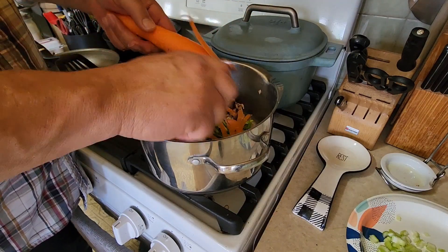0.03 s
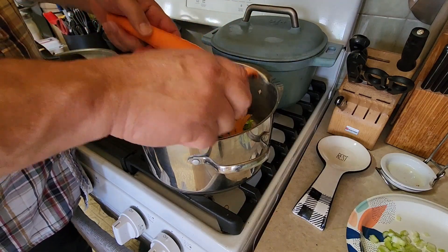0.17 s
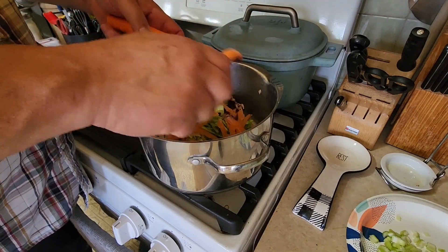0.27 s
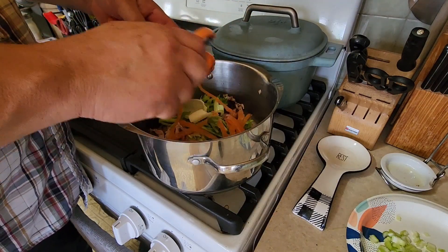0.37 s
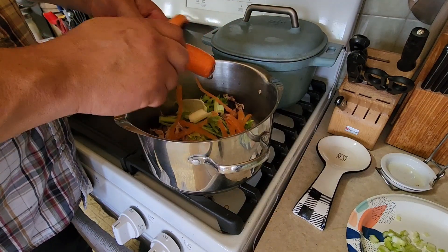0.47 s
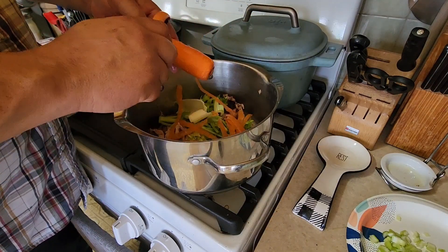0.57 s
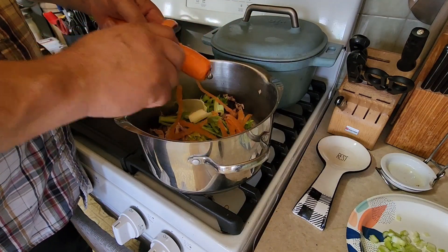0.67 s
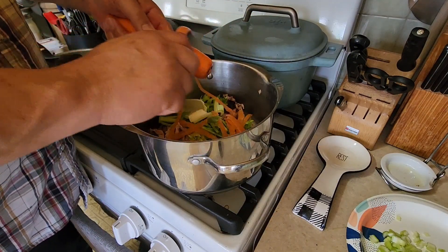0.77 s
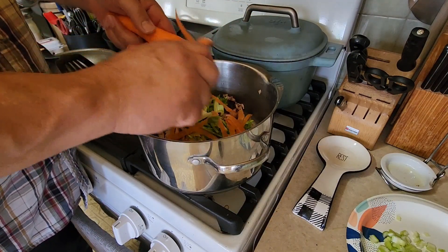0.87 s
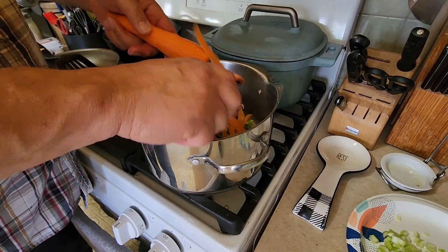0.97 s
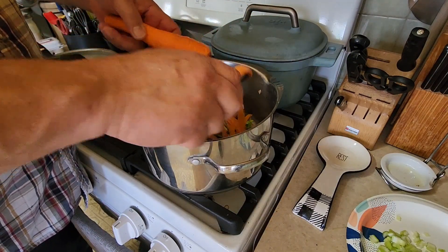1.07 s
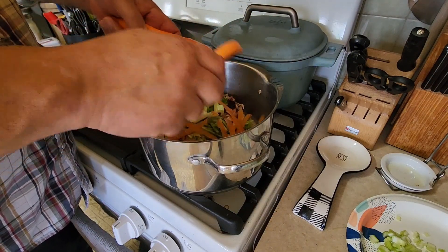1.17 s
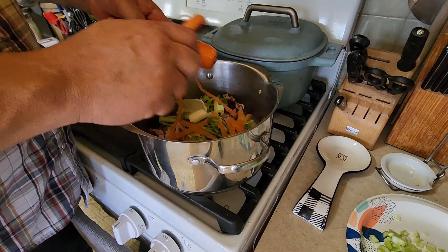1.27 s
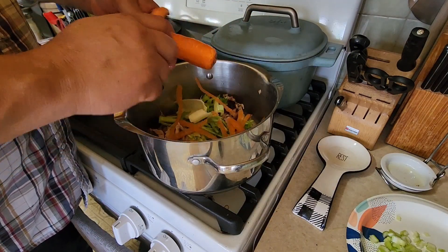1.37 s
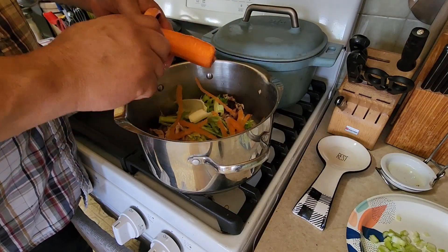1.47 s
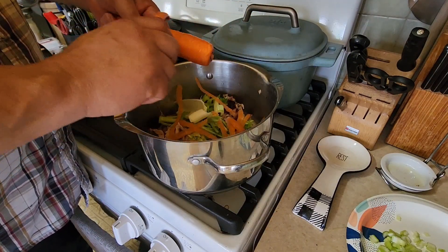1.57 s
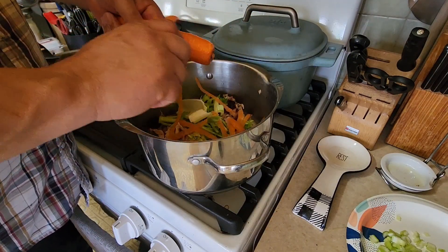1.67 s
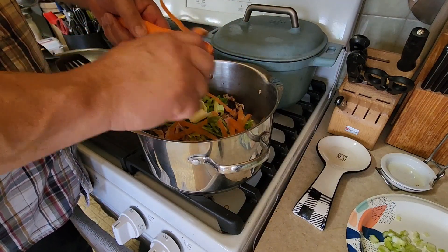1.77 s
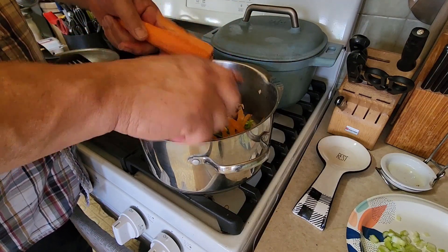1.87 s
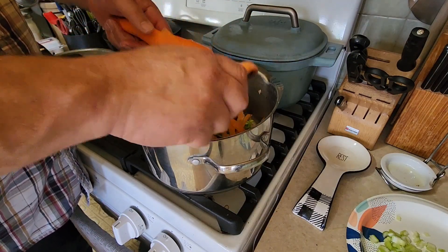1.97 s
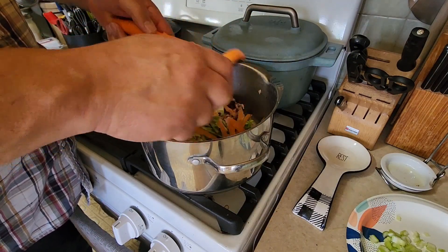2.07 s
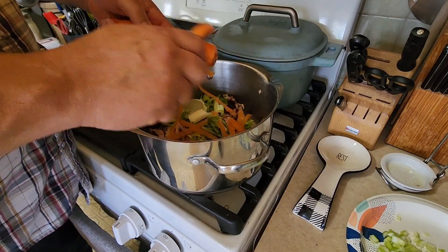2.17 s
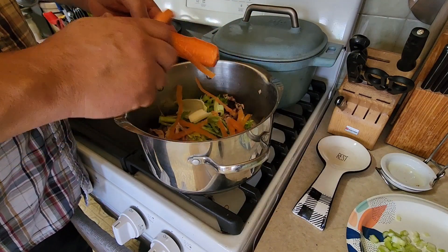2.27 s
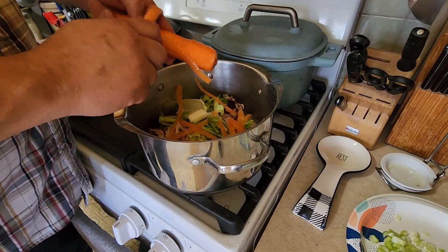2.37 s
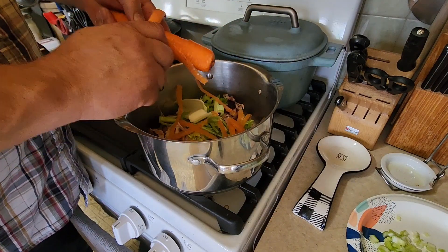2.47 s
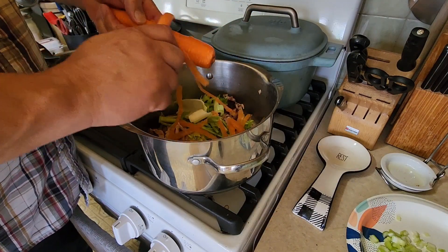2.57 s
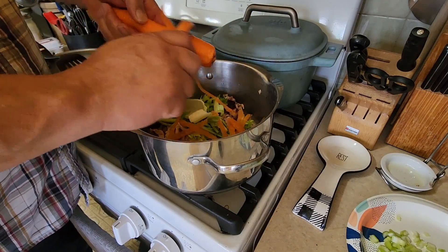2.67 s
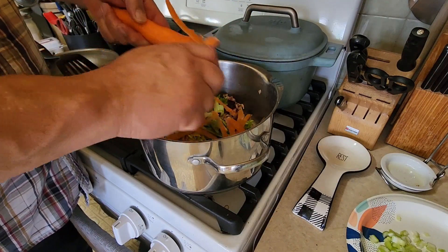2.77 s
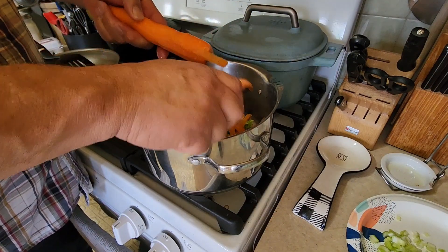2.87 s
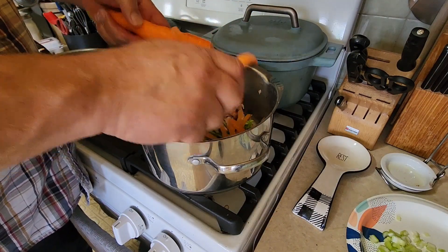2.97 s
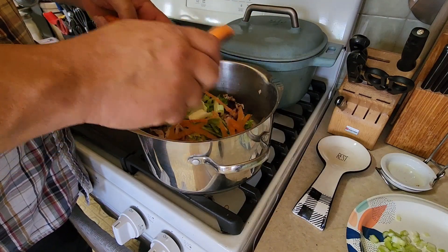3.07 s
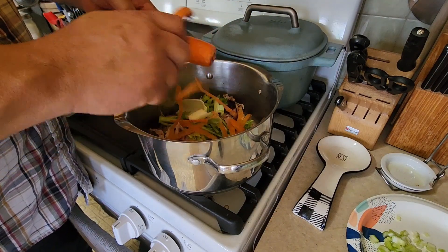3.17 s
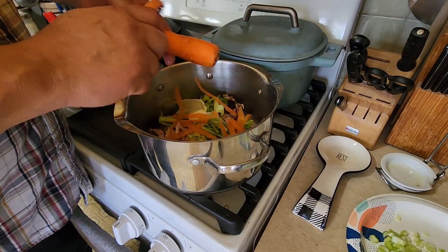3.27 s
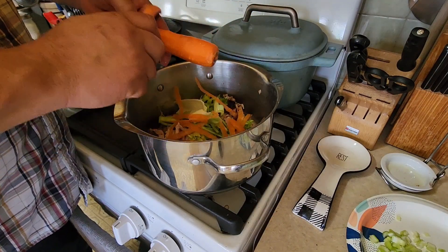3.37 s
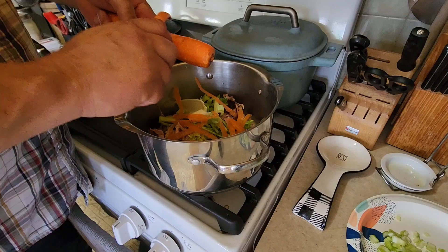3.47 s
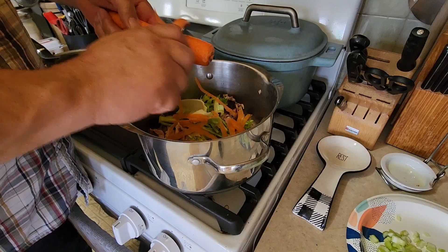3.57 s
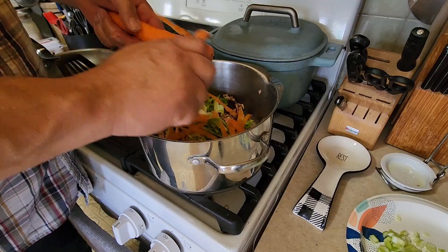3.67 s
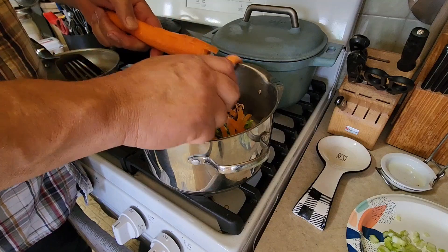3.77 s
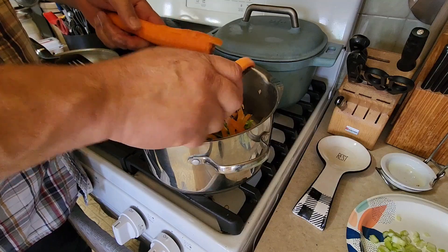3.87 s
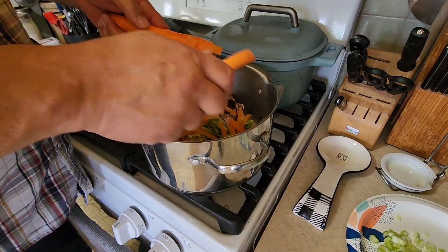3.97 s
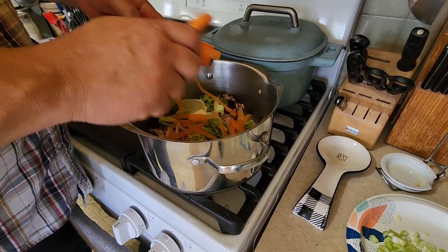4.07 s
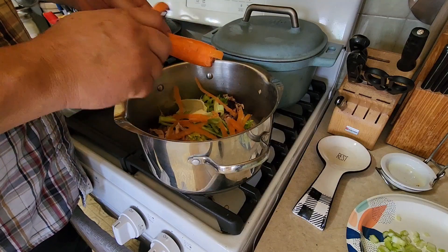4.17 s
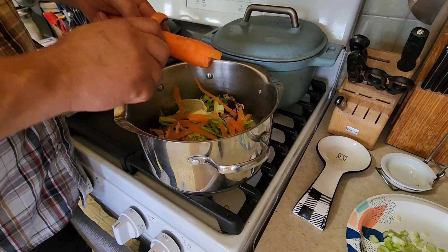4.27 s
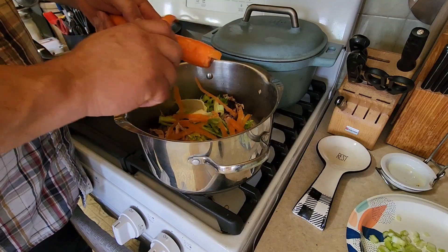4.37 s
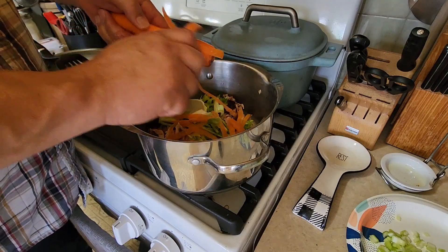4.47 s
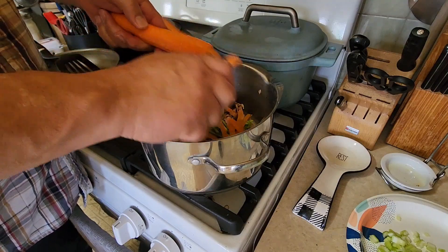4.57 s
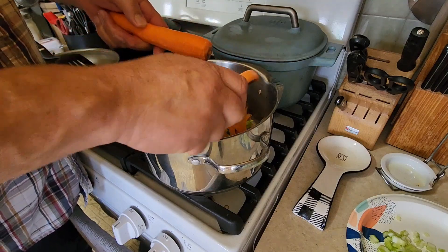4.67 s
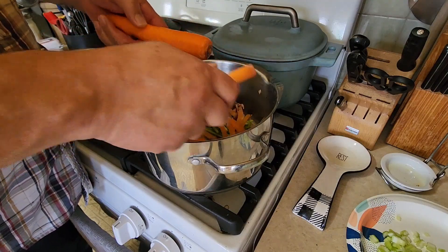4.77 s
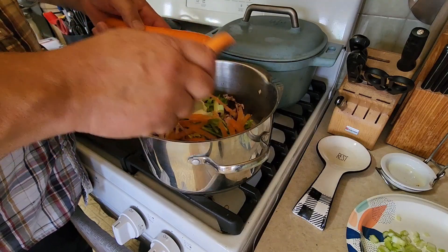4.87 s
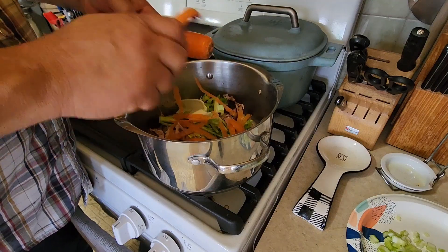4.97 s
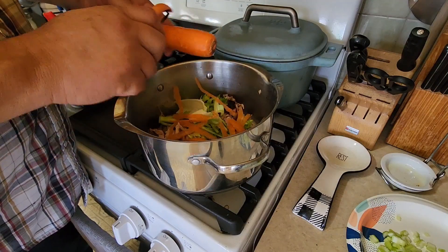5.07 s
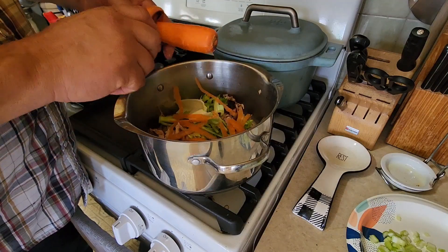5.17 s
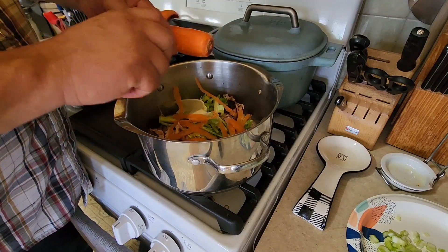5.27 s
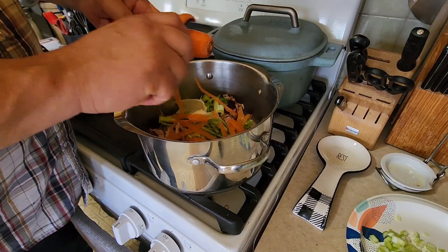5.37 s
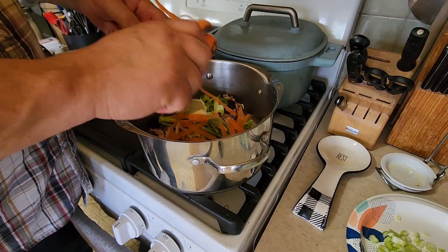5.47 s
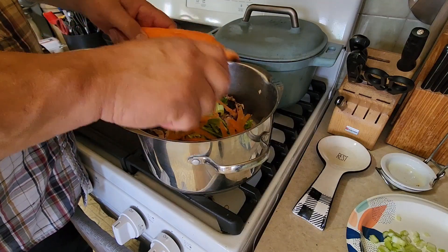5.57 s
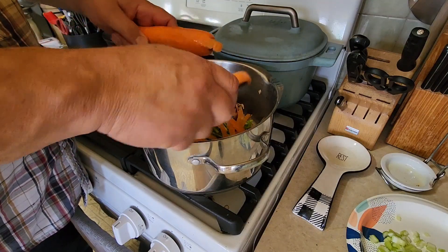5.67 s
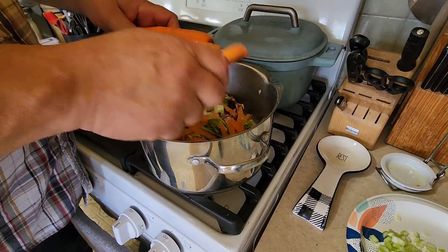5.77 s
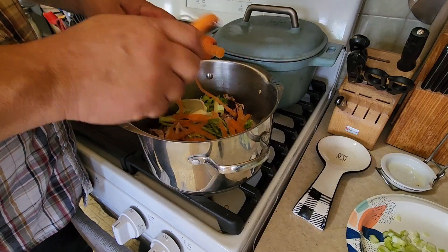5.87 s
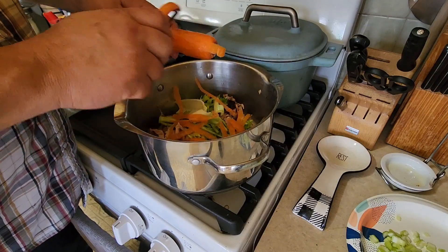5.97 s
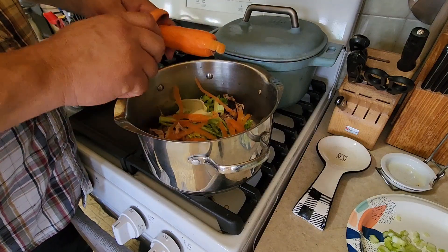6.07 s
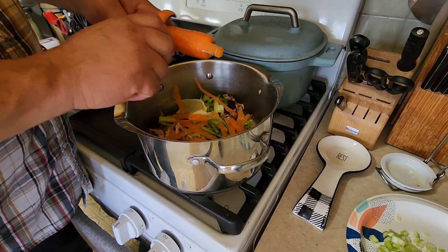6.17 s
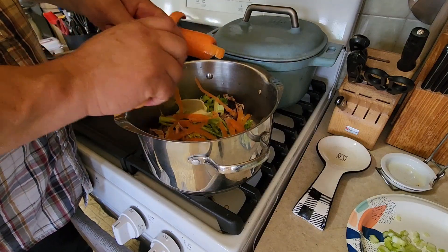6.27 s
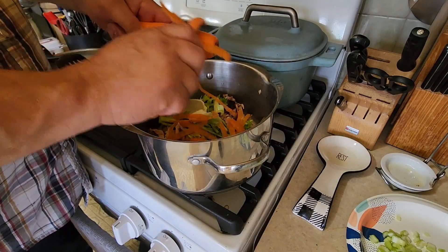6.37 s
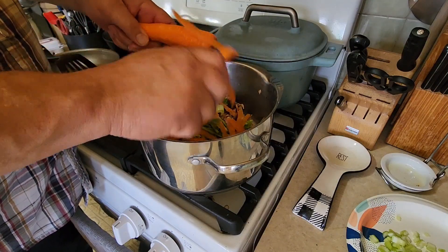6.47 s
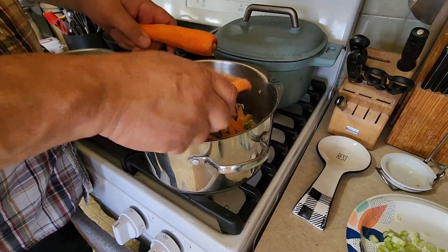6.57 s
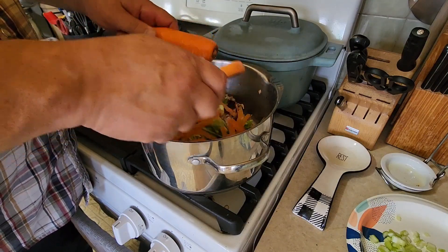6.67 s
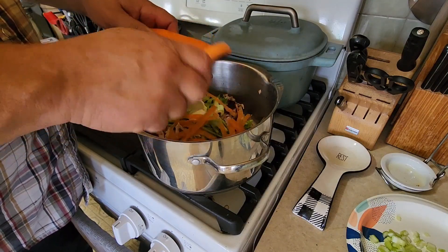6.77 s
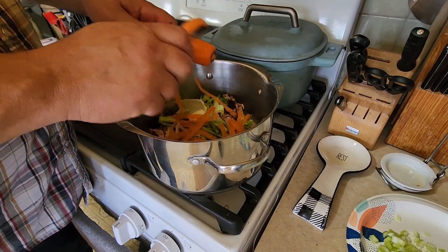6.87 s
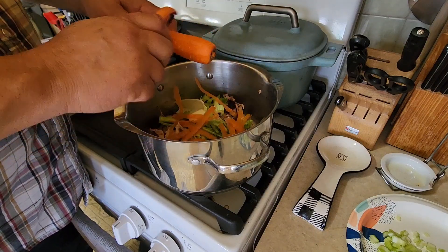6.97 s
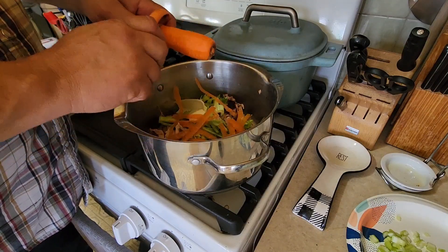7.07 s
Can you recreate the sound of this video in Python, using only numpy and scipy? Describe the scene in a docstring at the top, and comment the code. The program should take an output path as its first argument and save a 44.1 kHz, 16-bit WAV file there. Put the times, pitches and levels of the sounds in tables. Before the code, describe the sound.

In a small kitchen, a metal swivel peeler works along a raw carrot over a pot, close to a stereo microphone and slightly left. A low, gently wavering appliance hum with soft rumble and air runs from 0 to about 7.1 seconds. The first stroke is already under way and flicks off near 0.1. Further pulls start around 0.8, 1.6, 2.6, 3.5, 4.4, 5.3 and 6.2, each rasping for about 0.2 to 0.35 seconds. Crisp bites crackle just before or at the start, strongest near 2.4 and 4.3. The bright, fibrous scrape carries a gliding squeak, then ends in a ringing metallic click and a small tear. Faint blade ticks fill the gaps; soft wet peel pats land near 0.3, 1.3, 3.3, 4.9 and 6.7. A last crunchy bite comes at 7.1. Short, lively reflections follow each sound.

```python
"""Peeling a carrot over a pot

A swivel peeler takes strips off a raw carrot held over a steel pot in a small kitchen. Filtered random cracks
make the crunch of each bite, the rasp through crisp flesh and the tear at the end; squeaks are gliding resonances.
Decaying sine modes ring the blade as it flicks off and ticks on the way back; noise bursts drop peel into the pot.
An appliance motor hums throughout, as wavering sines over coloured noise."""
import sys
import numpy as np
from scipy import signal
from scipy.fft import rfft, irfft, next_fast_len
from scipy.io import wavfile

SR = 44100
rng = np.random.default_rng(int(sys.argv[2]) if len(sys.argv) > 2 else 0)


def wrap_up_sound(samples):
    """Save the sound to the file named by the first command line argument, as 16-bit audio."""
    columns = np.atleast_2d(samples).T
    # keep every value between -1 and 1, then stretch to whole-number steps
    tamed = np.clip(columns, -1, 1)
    steps = np.round(tamed * 32767).astype(np.int16)
    wavfile.write(sys.argv[1], SR, steps)


N = 314433

# Pulls of the peeler; levels before trims: start/s, slip-off/s, carrot body at end/dB, treble re rasp/dB,
# squeak f/Hz, squeak re rasp/dB, blade flick/dB, strip tear/dB, tear delay after slip-off/s
STROKES = [(-0.12, 0.118, -61.5, -3.5, 2640, -8, -51, -38, 0.0069),
           (0.782, 1.0047, -61.5, -3, 2850, -11, -32, -35, .021),
           (1.63, 1.9105, -61, -3, 2680, -18, -34.5, -42, .02),
           (2.554, 2.8775, -59.5, -1.5, 2830, -1, -29.5, -36.5, 0.025),
           (3.465, 3.81, -64.5, -2, 2910, -6, -31, -36, 0.022),
           (4.383, 4.6473, -62, -3, 2980, 1, -39.5, -53, 0.022),
           (5.296, 5.636, -68, -2.5, 2850, -9, -29, -35, 0.029),
           (6.185, 6.537, -63, -2, 3030, -7.5, -28, -34, 0.018)]
# Edge biting into skin; levels before trims: t/s, level/dB, treble re level/dB, carrot knock/dB, snap f/Hz
BITES = [(0.625, -33, -11.5, -58, 6840), (0.6958, -37, -29, -63, 3720), (0.7105, -39, -7, -80, 4660),
         (0.7232, -27.5, -6.5, -58, 4500), (1.5193, -23.5, -5, -56, 6800), (2.3991, -18.5, -3, -72, 3330),
         (2.4733, -36.5, -34, -60, 2700), (3.4311, -29.5, -2.5, -83, 2930), (3.4705, -30.5, -17, -65, 4970),
         (4.3055, -21, -4.5, -72, 6600), (4.3385, -23, -7.5, -55.5, 4480), (5.2555, -48, -33, -81, 2300),
         (5.2705, -36, -20, -54.5, 3000), (6.14, -47.5, -16, -69, 3170), (6.1668, -30.5, -1.5, -70, 2520),
         (7.118, -31.5, -11.5, -60, 5360)]
# Spectrum of crunch and blade chatter: f/Hz, relative level/dB
CRUNCH = [(200, -30.5), (520, -24), (950, -30.5), (1450, -16), (1850, -16), (2300, 0), (3030, 1),
          (3900, -7), (5000, 1), (5800, -3.5), (6300, 1), (7200, -1), (11000, -13), (15000, -9)]


def from_db(db):
    """Decibels to amplitude gain."""
    return 10 ** (np.asarray(db) / 20)


def rms_one(x):
    """Scale to rms 1."""
    return x / np.sqrt(np.mean(x ** 2) + 1e-20)


def at_hz(points, hz):
    """Interpolate a table on a log-frequency axis."""
    table_hz, values = np.array(points)[:, 0], np.array(points)[:, 1]
    return np.interp(np.log(hz + 1e-3), np.log(table_hz), values)


def coloured(x, spectrum):
    """Filter a steady signal by a gain table; rms 1."""
    size = next_fast_len(N)
    gain = from_db(at_hz(spectrum, np.fft.rfftfreq(size, 1 / SR)))
    return rms_one(irfft(rfft(x, size) * gain, size)[..., :N])


def cut(x, hz, kind, order=2):
    """Butterworth high- or low-pass."""
    sos = signal.butter(order, min(hz, .45 * SR), kind, fs=SR, output="sos")
    return signal.sosfilt(sos, x)


def drift(knots_per_s):
    """Random wavering: straight lines between independent normal knots."""
    knots = rng.standard_normal(4000)
    return np.interp(np.arange(N) / SR * knots_per_s, np.arange(len(knots)), knots)


def cracks(per_s, spread_db):
    """Tiny ruptures at random moments, most small and a few large."""
    sizes = from_db(spread_db * np.minimum(rng.exponential(1, N), 4))
    signs = rng.choice([-1, 1], N)
    return sizes * signs * (rng.random(N) < per_s / SR)


def burst(start_s, rise_s, t60_s):
    """Envelope with a linear rise and exponential decay, at most 0.5 s long."""
    out, at = np.zeros(N), int(start_s * SR)
    age_s = np.arange(min(N - at, SR // 2)) / SR
    out[at:at + len(age_s)] = np.minimum(age_s / rise_s, 1) * from_db(-60 * age_s / t60_s)
    return out


def split_treble(x, hz):
    """Parts below and above a frequency, each at rms 1."""
    low = signal.sosfiltfilt(signal.butter(3, hz, fs=SR, output="sos"), x)
    return rms_one(low), rms_one(x - low)


def with_treble(low, high, treble_db):
    """Mix two parts at constant power; treble_db sets the treble's amplitude, capped at 0.9."""
    share = np.clip(from_db(treble_db), 0, .9)
    return np.sqrt(1 - share ** 2) * low + share * high


def gliding_resonance(x, hz, width_hz):
    """Band-pass with a moving centre, by shifting to 0 Hz and back; rms 1."""
    turn = np.exp(2j * np.pi * np.cumsum(hz) / SR)
    return rms_one(np.real(cut(x / turn, width_hz / 2, "low") * turn))


def appliance(noise_db=-60.0, waver_db=-0.5, wander_rad=0.13, apart_hz=330, left_db=2.5, side_db=-1.0):
    """Motor hum wavering in level and phase over rumble and moving air; long waves reach both sides alike."""
    # motor partials: f/Hz, mean level/dB rms, left re right/dB
    hum_lines = [(41.8, -70.5, -1.5), (58.96, -48, 0.2), (80, -67, -0.5), (119.5, -63, -2),
                 (717, -86.5, -2)]
    # rumble and air spectrum: f/Hz, relative level/dB
    noise_spectrum = [(18, -19), (30, 5.5), (90, -3), (115, 3.5), (135, -12.5), (210, -13), (275, -22.5),
                      (340, -11), (395, -24.5), (450, -18.5), (580, -19), (700, -25.5), (1800, -32.5),
                      (7500, -44.5), (15000, -49)]
    t, sides = np.arange(N) / SR, np.array([[1], [-1]])
    hum = np.zeros((2, N))
    for hz, db, pan_db in hum_lines:
        amplitude = np.sqrt(2) * from_db(db + waver_db * drift(4.2) + sides * pan_db / 2)
        hum += amplitude * np.sin(2 * np.pi * hz * t + wander_rad * drift(8.9))
    mid, side = coloured(rng.standard_normal((2, N)), noise_spectrum)
    rumble = cut(mid, apart_hz, "low", order=1)
    air = cut(mid + from_db(side_db) * side * sides, apart_hz, "high", order=1)
    return hum + from_db(noise_db) * (rumble + air * from_db(left_db * sides))


def rasp(cells_per_s=6000, spread_db=2.0, judder_db=0.73, judder_per_s=130, fade_in_s=0.048,
         fade_out_s=0.034, rasp_db=2.45, squeak_db=-4.0, squeak_width_hz=600):
    """Cells burst densely under the edge; the strip squeaks as it curls and the carrot's body answers lower."""
    # hand pressure, one list per stroke: t/s, rasp level before trims/dB
    pressures = [
        [(0.015, -47), (0.051, -49.5), (0.105, -52)],
        [(0.76, -50), (0.8, -51.5), (0.946, -50), (0.995, -49)],
        [(1.6, -53.5), (1.658, -48), (1.7, -53), (1.822, -46.5), (1.895, -51)],
        [(2.53, -57.5), (2.69, -50.5), (2.738, -48), (2.865, -52)],
        [(3.5, -54), (3.512, -56.5), (3.536, -52), (3.778, -48), (3.795, -53)],
        [(4.4, -52.5), (4.444, -51.5), (4.506, -45), (4.616, -51), (4.635, -56.5)],
        [(5.3, -52.5), (5.338, -51.5), (5.37, -50), (5.602, -47.5), (5.615, -47)],
        [(6.2, -54), (6.296, -48.5), (6.344, -53), (6.492, -45.5), (6.525, -57.5)],
    ]
    # edge spectrum: f/Hz, relative level/dB
    edge_spectrum = [(700, -21), (1100, -25.5), (1500, -17), (1900, -11), (2300, -1), (2900, -0.5),
                     (3600, -5), (4800, -4), (5500, -5), (6300, 0.5), (8000, -2.5), (10700, -9.5),
                     (12500, -4), (15500, -5.5)]
    # carrot body spectrum: f/Hz, relative level/dB
    body_spectrum = [(200, -14), (350, -11.5), (460, -4), (570, 5.5), (720, -15), (900, -1.5),
                     (1100, -21.5), (1500, -2.5), (2300, -18)]
    hand_waver_db, hand_wavers_per_s = 0.9, 35   # pressure is never quite even
    body_rise_db, squeak_fade_db = 20, 5   # start to end: the cut deepens, the squeak gives way
    squeak_sag = .05   # mid-stroke drop from the ends, as a share of table pitch
    usual_level_db, body_follows, treble_follows = -49, 0.98, 0.22   # slopes: dB per extra dB of pressure

    t, out = np.arange(N) / SR, np.zeros(N)
    waver_db = judder_db * drift(judder_per_s) + hand_waver_db * drift(hand_wavers_per_s)
    cells = cracks(cells_per_s, spread_db) * from_db(waver_db)
    low, high = split_treble(coloured(cells, edge_spectrum), 5850)
    body = coloured(cells, body_spectrum)
    for stroke, pressure in zip(STROKES, pressures):
        start, end, body_db, treble_db, pitch_hz, squeak_re_rasp_db, *_ = stroke
        # fades lie outside start..end
        contact = np.clip(np.minimum((t - start) / fade_in_s, (end - t) / fade_out_s) + 1, 0, 1)
        on = contact > 0
        along = np.clip((t[on] - start) / (end - start), 0, 1)
        level_db = np.interp(t[on], *np.transpose(pressure))
        extra_db = level_db - usual_level_db
        body_level_db = body_db - body_rise_db * (1 - along) + body_follows * extra_db
        treble = treble_db + treble_follows * extra_db
        # duller as the edge lifts
        edge = from_db(level_db + rasp_db) * with_treble(low[on], contact[on] * high[on], treble)
        squeak_hz = pitch_hz * (1 + squeak_sag * (.5 - np.sin(np.pi * along)))
        squeak_level_db = level_db + squeak_re_rasp_db - squeak_fade_db * (along - .5) + squeak_db
        squeak = from_db(squeak_level_db) * gliding_resonance(cells[on], squeak_hz, squeak_width_hz)
        out[on] += np.sqrt(contact[on]) * (edge + squeak + from_db(body_level_db) * body[on])
    return out


def knocks():
    """Blade against its stop at stroke ends and on the way back: (t/s, level/dB, chatter re ring/dB)."""
    # loose-blade ticks, before trims: t/s, level/dB, chatter re ring/dB
    ticks = [(0.4116, -49.5, 6), (1.1083, -59, 9), (1.473, -53, -14), (3.268, -58, 6), (3.3328, -62, 6),
             (3.3792, -52, -5), (4.244, -61, 4.5), (4.779, -46.5, -1), (5.1134, -49.5, -20),
             (5.164, -53.5, 0.5), (6.0386, -63.5, -12), (6.6687, -56, 9), (7.004, -56, -5),
             (7.0411, -49, -10)]
    flick_chatter_db = 7
    flicks = [(end, flick_db, flick_chatter_db) for _, end, *_, flick_db, _, _ in STROKES]
    return flicks + ticks


def blade(chatter_t60_s=0.048, chatter_rise_s=0.0038, contacts_per_s=5000, ring_db=-1.5, tick_db=-7.5):
    """The blade chatters on its stop and rings in decaying modes; gentle knocks excite high modes less."""
    # steel blade and frame modes, before tilt and variation: f/Hz, relative level/dB, t60/s
    blade_modes = [(2230, -6, .05), (2560, -5, .04), (3030, 2, .06), (3170, 2, .07), (3900, -6, .03),
                   (4690, -1, .035), (4760, -3, .07), (5530, -4, .035), (6200, 0, .03), (6600, 0, .045),
                   (7547, -14, .33), (8550, -12, .17), (12230, -5, .07), (12835, -7, .07)]
    t = np.arange(SR // 2) / SR
    hz, mode_db, t60_s = np.transpose(blade_modes)[:, :, None]
    contacts = coloured(cracks(contacts_per_s, spread_db=1.5), CRUNCH)
    contacts = rms_one(cut(contacts, 8000, "low", order=1))
    hard_db, tilt_per_octave, vary_db = -27, .22, 2.0   # tilt: dB per octave per dB re hard_db
    out = np.zeros(N)
    for s, db, chatter_db in knocks():
        tilt_db = tilt_per_octave * (db - hard_db) * np.log2(hz / hz[0])
        strength = from_db(mode_db + tilt_db + vary_db * rng.standard_normal(hz.shape))
        phase = 2 * np.pi * (hz * t + rng.random(hz.shape))
        modes = strength * from_db(-60 * t / t60_s) * np.sin(phase)
        ring = modes.sum(0) / np.linalg.norm(strength) * np.minimum(t / 0.00064, 1)
        at = int(s * SR)
        out[at:at + len(t)] += from_db(db + ring_db) * ring[:N - at]
        chatter = burst(s, chatter_rise_s, chatter_t60_s) * contacts
        out += from_db(db + chatter_db + tick_db) * chatter
    return out


def ruptures():
    """Bites, and the strip tearing free just after slip-off: (t/s, level/dB, treble/dB, t60/s, snap f/Hz)."""
    bite_t60_s = 0.053
    tear_t60_s, tear_treble_db, tear_snap_hz = 0.048, -1.5, 3530
    entries = [(s, db, treble_db, bite_t60_s, hz) for s, db, treble_db, _, hz in BITES]
    tears = [(end + delay_s, db, tear_treble_db, tear_t60_s, tear_snap_hz)
             for _, end, *_, db, delay_s in STROKES]
    return entries + tears


def bites(cells_per_s=9000, spread_db=6.5, rise_s=0.0054, level_db=0.0, snap_width_hz=800,
          knock_db=-2.0, knock_t60_s=0.12, lead_in_db=-27.5, lead_in_s=0.018):
    """A patch of cells gives way and snaps at its own pitch; bites also jolt the carrot."""
    # carrot knock spectrum: f/Hz, relative level/dB
    knock_spectrum = [(200, -38), (400, -8.5), (550, 4.5), (750, -15), (1400, -32)]
    snap_db = -8.5   # re crunch
    cells = cracks(cells_per_s, spread_db)
    low, high = split_treble(coloured(cells, CRUNCH), 8400)
    fibres = cracks(cells_per_s, spread_db)
    crunch, jolt = np.zeros(N), np.zeros(N)
    for s, db, treble_db, t60_s, snap_hz in ruptures():
        # faint noise swells before each burst
        lead_in = from_db(lead_in_db) * burst(s - lead_in_s, lead_in_s, 2 * t60_s)
        force = burst(s, rise_s, t60_s) + lead_in
        on = force > 0
        snap = gliding_resonance(fibres[on], np.full(on.sum(), snap_hz), snap_width_hz)
        texture = with_treble(low[on], high[on], treble_db) + from_db(snap_db) * snap
        crunch[on] += from_db(db + level_db) * force[on] * texture
    for s, _, _, bite_knock_db, _ in BITES:
        jolt += from_db(bite_knock_db + knock_db) * burst(s, 0.009, knock_t60_s)
    return crunch + jolt * coloured(cells, knock_spectrum)


def peels(t60_s=0.093, level_db=-1.0):
    """Soft wet strips pat down in the pot as decaying bursts of coloured cracks."""
    # peel landings, before trims: t/s, level/dB, splat above about 2 kHz re level/dB
    landings = [(0.328, -49, 2), (1.221, -66.5, 3), (1.292, -62.5, -1), (3.065, -61.5, -3),
                (3.309, -56.5, -2.5), (4.83, -60, -3), (4.891, -57.5, -23), (4.965, -67.5, 0.5),
                (6.685, -56.5, 9)]
    # landing spectrum: f/Hz, relative level/dB
    pat_spectrum = [(150, 16), (450, 7), (900, 10), (1600, 5.5), (3000, -3.5), (7000, 1.5), (10000, -18),
                    (15000, -6)]
    pat, splat = split_treble(coloured(cracks(3000, spread_db=3.0), pat_spectrum), 1900)
    out = np.zeros(N)
    for s, db, splat_db in landings:
        out += from_db(db + level_db) * burst(s, 0.00096, t60_s) * with_treble(pat, splat, splat_db)
    return out


def reflections(near_db=7.0, near_t60_s=0.035, room_db=-0.5, build_up_s=0.015):
    """Quick scatter from pot, hands and stove, then the room's ring; one noise response per side."""
    # kitchen decay: f/Hz, t60/s
    room_decay = [(300, 0.37), (2500, 0.3), (6500, 0.36), (10000, 0.23), (15000, 0.24)]
    t = np.arange(SR // 2) / SR
    hz, frame_s, field = signal.stft(rng.standard_normal((2, len(t))), SR, nperseg=256)
    decay = from_db(-60 * frame_s / at_hz(room_decay, hz)[:, None])
    tail = signal.istft(field * decay, SR)[1][:, :len(t)]
    tail = tail * np.minimum(t / build_up_s, 1)
    near = rng.standard_normal((2, len(t))) * from_db(-60 * t / near_t60_s)
    return (from_db(near_db) * rms_one(near) + from_db(room_db) * rms_one(tail)) / np.sqrt(len(t))


def kitchen(x, moves_per_s=7, right_lag_s=0.0002213, count=5):
    """The arm keeps moving, so the sound passes between reflection patterns; direct sound lags at right."""
    weights = np.array([drift(moves_per_s) for _ in range(count)])
    weights = weights / np.linalg.norm(weights, axis=0)
    reflected = np.zeros((2, N))
    for weight in weights:
        reflected += signal.oaconvolve((weight * x)[None], reflections(), axes=1)[:, :N]
    right = np.interp(np.arange(N) - right_lag_s * SR, np.arange(N), x)
    return reflected + np.stack([x, right])


def scene(left_db=1.95, work_db=-4.5):
    """The hands work a little to the left of the microphone; the motor hums throughout."""
    work = from_db(work_db) * (rasp() + blade() + bites() + peels())
    return kitchen(work) * from_db([[left_db], [-left_db]]) + appliance()


def record(dry):
    """Steep elliptic low-pass takes off the top."""
    cutoff_hz = 15550
    return signal.sosfilt(signal.ellip(10, .1, 80, cutoff_hz, fs=SR, output="sos"), dry)


dry = scene()
out = record(dry)
wrap_up_sound(out)
```